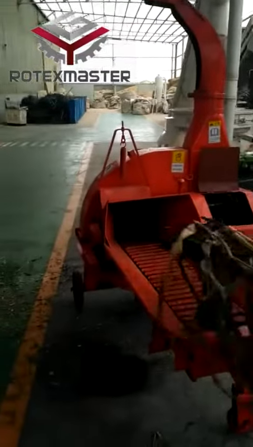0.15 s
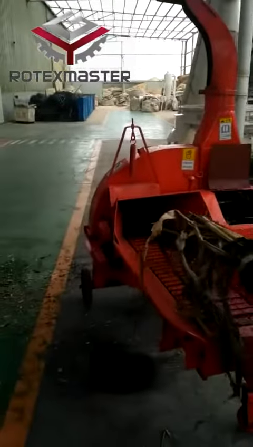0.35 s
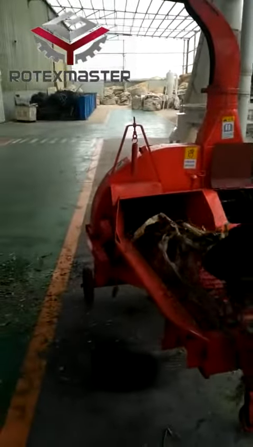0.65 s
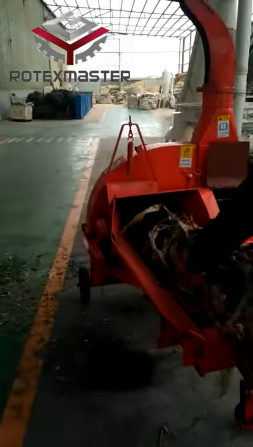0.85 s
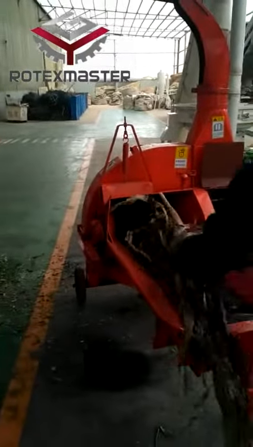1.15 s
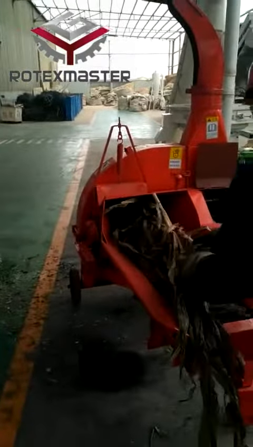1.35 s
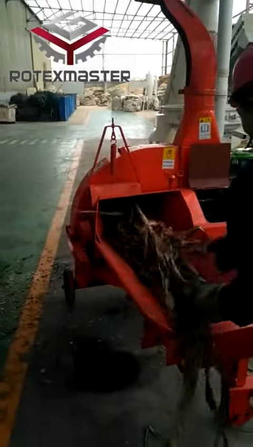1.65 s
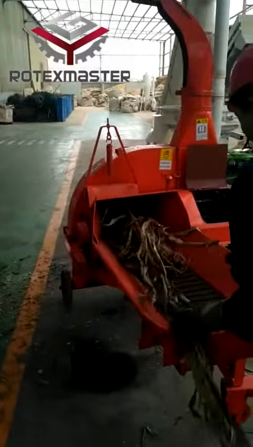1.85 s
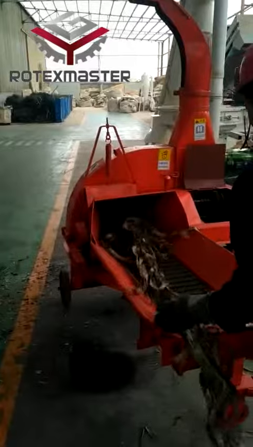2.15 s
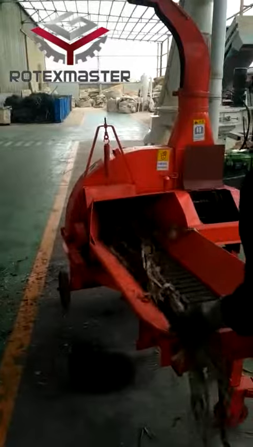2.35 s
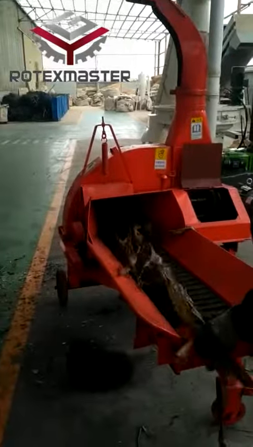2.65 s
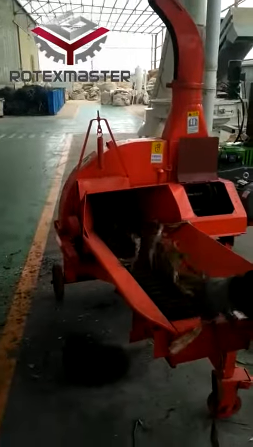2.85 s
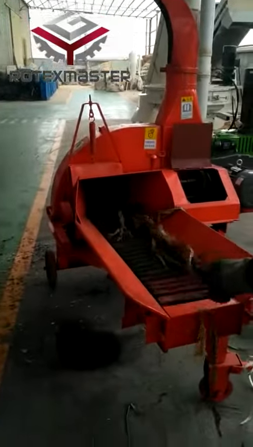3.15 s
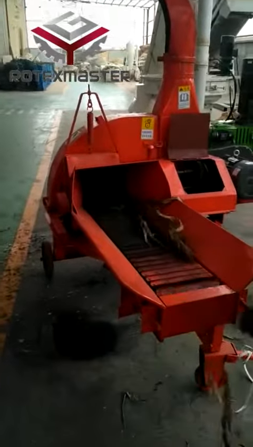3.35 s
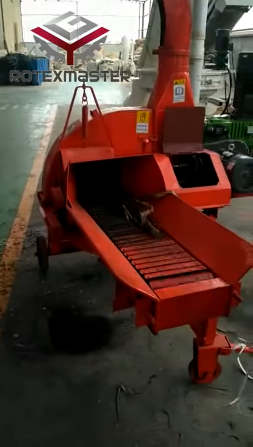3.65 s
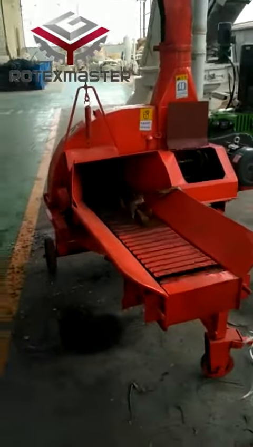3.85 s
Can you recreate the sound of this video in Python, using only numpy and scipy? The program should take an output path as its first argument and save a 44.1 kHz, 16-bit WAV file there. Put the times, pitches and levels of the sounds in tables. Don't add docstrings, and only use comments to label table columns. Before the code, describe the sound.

Dry stalks shredded in a farm machine inside a factory hall. Idle hum and regular clanks lead to harsh fluttering leaf fizz and lower stem thuds, which stop abruptly, heard on a phone with gain control.

```python
import sys
import numpy as np
from scipy import signal
from scipy.io import wavfile
from scipy.ndimage import uniform_filter1d

SR = 44100
rng = np.random.default_rng(int(sys.argv[2]) if len(sys.argv) > 2 else 0)


def ratio(d):
    e = np.asarray(d, float) / 20
    return 10 ** e


def int16_out(signal):
    q = np.round(np.clip(np.atleast_2d(signal).T, -1, 1) * 32767)
    wavfile.write(sys.argv[1], SR, q.astype(np.int16))


N = 176400
FIRST_PASS_S = 1.3835


def evened(x):
    return x / np.sqrt(np.mean(x ** 2) + 1e-20)


def read(points, hz):
    f, value = np.transpose(points)
    return np.interp(np.log(hz + 1), np.log(f + 1), value)


def follow(table, t, axis):
    return np.interp(t, np.array(table)[:, 0], np.array(table)[:, axis])


def slow(top_hz):
    t = np.arange(N // 64 + 2) * 64 / SR
    x = sum(np.sin(2 * np.pi * (f * t + rng.random())) for f in np.geomspace(top_hz / 5, top_hz, 24))
    return np.interp(np.arange(N) / 64, np.arange(len(t)), evened(x))


def noise(field_db, patchy_db, size=512, extra_db=lambda hz, s: 0):
    frames = N * 4 // size + 5
    hz = np.fft.rfftfreq(size, 1 / SR)
    real, imaginary, patches = rng.standard_normal((frames, len(hz), 3)).T
    patches = uniform_filter1d(patches, size // 128, 0)
    patches = evened(uniform_filter1d(patches, 6000 // size, 1))
    grid = hz[:, None], np.arange(frames)[None] * size / 4 / SR
    gain = ratio(field_db(*grid)) * np.ones(real.shape)
    gain = gain / np.sqrt((gain ** 2).mean(0))
    spectra = (real + 1j * imaginary) * gain * ratio(patchy_db * patches)

    def back(z):
        return signal.istft(z, nperseg=size, noverlap=size * 3 // 4)[1][:N]
    return back(spectra * ratio(extra_db(*grid))) / np.std(back(spectra))


def passes(rise_s, fall_s, bed, late_s, count=105):
    # (time [s], factor on the bed between the cuts)
    loose_leaves = [
        (1.4, 1.5),
        (1.53, 2.2),
        (1.85, 2.2),
        (2.05, .9),
        (2.5, .9),
        (2.75, 1.15),
    ]
    passes_per_s, jitter_s, spread_db = 40.0, .0008, 1.5
    chance = rng.standard_normal((count, 2))
    at = FIRST_PASS_S + late_s + np.arange(count) / passes_per_s + jitter_s * chance[:, 0]
    train = np.zeros(N)
    train[np.minimum(at * SR, N - 1).astype(int)] = ratio(spread_db * chance[:, 1])
    t = np.arange(-1500, 1501) / SR
    shape = np.exp(-(t / np.where(t < 0, rise_s, fall_s)) ** 2)
    chaff = bed * follow(loose_leaves, np.arange(N) / SR, axis=1)
    env = chaff + signal.oaconvolve(train, shape, "same")
    return env / np.sqrt(np.mean(env[N // 2:] ** 2))


def shredding():
    # (time [s], leaf fizz [dB], stem thud [dB], lowest stem pitch [octaves above 100 Hz])
    load = [(1.36, -45, -62, 3.3), (1.38, -25, -35, 6.5), (1.46, -32, -33.5, 12), (1.5, -30.5, -59, 5.7),
            (1.66, -31, -46, 4.3), (1.92, -30.5, -44, 4.02), (2.08, -26.5, -35, 4.34),
            (2.11, -27.5, -33.5, 2.8), (2.36, -28.5, -31.5, 1.6), (2.84, -30.5, -38.5, 0.68),
            (2.9, -29, -39, 4.8), (2.93, -29, -51, 3.8), (2.98, -35, -46, 2.7), (3.02, -50, -53.5, 3.3),
            (3.25, -48, -58, 1.2), (3.55, -47.5, -52, 3.4), (3.85, -51.5, -64, 5.2), (4, -52.5, -61, 2.2)]
    # (frequency [Hz], density [dB per Hz])
    leaf_spectrum = [(2350, -20.5), (4000, -18), (4450, -17.5), (6310, -10), (8000, -10.5), (11100, -7),
                     (13600, 0.5), (16000, -2.5), (16500, -53)]
    # (frequency [Hz], density [dB per Hz])
    stem_spectrum = [(290, -49), (500, -2.5), (872, 2.5), (1020, 0.5), (2290, -3.5), (2750, -1), (4000, 0),
                     (5970, -9.5), (9000, -21), (11700, -16), (19800, -120)]
    edge_db_per_oct, stem_top_hz = 59, 7700
    t = np.arange(N) / SR

    def stem_db(hz, s):
        below_edge = np.maximum(follow(load, s, axis=3) - np.log2(hz / 100 + 1e-3), 0)
        above_top = np.maximum(np.log2(hz / stem_top_hz + 1e-3), 0)
        return read(stem_spectrum, hz) - edge_db_per_oct * below_edge - 20 * above_top

    fizz = noise(lambda hz, s: read(leaf_spectrum, hz), 1.0)
    fizz = fizz * passes(rise_s=.006, fall_s=.009, bed=.68, late_s=0)
    fizz = fizz * ratio(follow(load, t, axis=1))
    thud = noise(stem_db, 1.6) * passes(rise_s=.0035, fall_s=.007, bed=.6, late_s=-.0014)
    thud = thud * ratio(follow(load, t, axis=2))
    return signal.sosfilt(signal.butter(4, 220, "high", fs=SR, output="sos"), fizz + thud)


def burst(t, rise_s, fall_s):
    return (1 - np.exp(-t / rise_s)) * np.exp(-t / fall_s)


def clanks():
    # (time [s], peak [dB], slat ring re peak [dB], length [ms])
    blows = [(.006, -21.5, -16.5, 9.2), (.078, -32, -16, 8), (.099, -34, -25, 5), (0.152, -15.5, -22.5, 18),
             (0.221, -23, -24, 8.4), (.234, -36, -21, 7), (.298, -15.5, -20, 11), (0.309, -26.5, -6, 8.2),
             (0.368, -26, -16, 9.5), (0.451, -13, -28, 7), (0.4618, -9.5, -44, 7.6), (0.517, -24, -25, 9.1),
             (0.5937, -25, -10, 10.3), (.665, -36.5, -13, 9.4), (.677, -28.5, -27, 6),
             (0.742, -23.5, -9, 13), (.809, -29, -17, 8), (.826, -36, -16, 5), (0.891, -24.5, -17, 9.2),
             (.960, -31, -17, 8.9), (1.039, -17.5, -11.5, 10), (1.109, -27.5, -8, 12),
             (1.185, -27, -7.5, 13), (1.194, -11, -32, 3.5), (1.197, -43, -17, 4.9), (1.256, -27, -4.5, 10),
             (1.333, -25.5, -11.5, 10), (1.362, -27, -23, 5.3), (1.373, -14, -23, 23),
             (1.399, -13, -40, 12), (1.455, -23, -40, 18), (1.476, -15.5, -47, 39), (1.582, -13, -30, 18),
             (1.601, -11.5, -18.5, 35), (1.884, -18, -30, 2.5), (3.154, -43.5, -20, 6),
             (3.57, -38.5, -11, 12), (3.851, -38, -25, 6), (3.921, -37.5, -31, 10), (3.994, -35, -28, 8)]
    # (frequency [Hz], density [dB per Hz])
    blow_spectrum = [(1180, -67), (2000, -30), (3430, -22), (4510, -23), (8000, -15), (13200, -1),
                     (15600, 1), (16500, -14.5)]
    # (frequency [Hz], width [Hz], level [dB])
    slat_modes = [(5440, 460, 4.5), (4440, 840, -1), (6850, 1800, -2), (3350, 460, -2)]
    blow_db, ring_trim_db = -10, -5
    rise_share, rise_s = .2, .0011
    t = np.arange(8000) / SR
    blow_tail = ratio(-10.5) * burst(t, rise_s, .013)
    ring_tail = ratio(-6.5) * burst(t, rise_s, .032)
    bright, ring = np.zeros((2, N + 8000))
    for s, db, ring_db, ms in blows:
        length_s = ms / 1000
        body = np.minimum(t / (rise_share * length_s), 1) * np.exp(-(t / length_s) ** 2.5)
        at = slice(round(s * SR), round(s * SR) + 8000)
        bright[at] += ratio(db + blow_db) * (body + blow_tail)
        ring[at] += ratio(db + ring_db + ring_trim_db) * (body + ring_tail)

    def modes_db(hz, s):
        return 10 * np.log10(sum(ratio(2 * db) / (1 + (2 * (hz - f) / w) ** 2) ** 2 for f, w, db in slat_modes))

    blow_noise = noise(lambda hz, s: read(blow_spectrum, hz), 0.77, size=256)
    return bright[:N] * blow_noise + ring[:N] * noise(modes_db, 2.0, size=256)


def machine():
    # (time [s], level [dB])
    roar_level = [(0, -42), (.18, -42), (.52, -43.5), (1.16, -41), (1.42, -44.5), (1.6, -51), (1.95, -54.5),
                  (2.35, -57), (2.85, -64.5), (3.09, -57.5), (3.4, -56), (4, -53)]
    # (frequency [Hz], density [dB per Hz])
    roar_spectrum = [(30, -13), (110, -4), (350, -2), (2600, -12), (2900, -17), (8100, -36), (13500, -48),
                     (16000, -21.5)]
    # (frequency [Hz], level [dB])
    rotor_orders = [(40.2, -70), (80.4, -52.5), (120.6, -57), (160.8, -45.5), (201, -53), (241.2, -54),
                    (366, -56.5), (402, -68), (967, -56.5), (1362, -60)]
    # (frequency [Hz], factor on the sag in dB [1])
    sag_share = [(30, 1.84), (100, 1.24), (160, 1.21), (300, 1.45), (700, 1.28), (1500, 0.88), (3000, 0.83),
                 (12000, 0.064)]
    hum_sag, waver_db, waver_rad = .94, .7, .12
    t, top_db = np.arange(N) / SR, roar_level[0][1]

    def sag_db(hz, s):
        return read(sag_share, hz) * (follow(roar_level, s, axis=1) - top_db)

    roar = noise(lambda hz, s: read(roar_spectrum, hz), 2.1, size=2048, extra_db=sag_db)
    hum = np.zeros(N)
    for hz, db in rotor_orders:
        level = ratio(db + hum_sag * sag_db(hz, t) + waver_db * slow(15.0))
        phase = 2 * np.pi * (hz * t + rng.random()) + waver_rad * slow(8.0) * np.sqrt(hz / 160)
        hum += level * np.sqrt(2) * np.sin(phase)
    return ratio(top_db + 3.0) * roar + hum


def open_bands():
    # (start [s], length [s], low edge [Hz], high edge
    # [Hz])
    gate_bands = [(.155, .05, 15200, 15800), (.29, .05, 15200, 15800), (.309, .085, 5200, 5900),
                  (.312, .03, 10300, 11800), (.468, .08, 10000, 15500), (.595, .02, 15200, 15800),
                  (.75, .07, 4800, 6200), (1.044, .05, 5100, 5800), (1.046, .04, 8000, 9300),
                  (1.2, .05, 5000, 5700), (1.205, .045, 12000, 15800), (1.256, .06, 4900, 7400),
                  (1.37, .045, 420, 840), (1.376, .04, 6000, 8500), (1.48, .1, 2800, 3800),
                  (1.57, .1, 2500, 4200), (1.601, .02, 2100, 7000), (1.64, .18, 1170, 1360),
                  (1.7, .08, 1800, 4000), (2.02, .08, 1100, 1500), (2.11, .42, 230, 330),
                  (2.185, .027, 40, 150), (2.287, .24, 1500, 2500), (2.3, .59, 590, 2630),
                  (2.655, .03, 35, 110), (2.77, .05, 310, 450), (2.93, .12, 5230, 7700),
                  (2.944, .25, 1900, 2500), (2.95, .26, 3100, 3800), (2.95, .3, 1350, 1700),
                  (2.96, .3, 680, 860), (3.15, .012, 1200, 3000), (3.43, .3, 1950, 2250),
                  (3.5, .22, 240, 340), (3.51, .07, 1100, 1600), (3.6, .12, 360, 1200),
                  (3.91, .12, 300, 1500)]
    gate_levels = [-43, -42, -47.5, -44, -44, -46, -52, -50, -52, -49, -44.5, -44.5, -43.5, -40.5, -48.5,
                   -49, -42, -53, -47, -49.5, -59.5, -61, -40.5, -41, -62.5, -51, -48, -60.5, -59, -55.5,
                   -59.5, -51.5, -59, -64, -56, -56, -53.5]
    open_s, close_s, edge_oct = .004, .012, .014

    def soft(u):
        return 1 / (1 + np.exp(-np.clip(u, -40, 40)))

    def field_db(hz, s):
        power = 0
        for (at, length, low, high), db in zip(gate_bands, gate_levels):
            opening = soft((s - at) / open_s * 3)
            closing = soft((at + length - s) / np.minimum(close_s, length / 6))
            above_low = soft(np.log2(hz / low + 1e-9) / edge_oct)
            below_high = soft(np.log2(high / (hz + 1)) / edge_oct)
            density = ratio(2 * db) * SR / 2 / (high - low)
            power = power + density * opening * closing * above_low * below_high
        return 10 * np.log10(power + 1e-20)

    throb = passes(rise_s=.013, fall_s=.015, bed=1.0, late_s=0)
    gated = noise(lambda hz, s: 0 * hz, 1.8, size=1024, extra_db=field_db)
    return gated * np.where(np.arange(N) > FIRST_PASS_S * SR, throb, 1)


def scene():
    return (shredding() + clanks() + machine() + open_bands())[None]


def low_pass(x):
    return signal.sosfilt(signal.butter(12, 16990, fs=SR, output="sos"), x)


def record(dry):
    edge_hz, leak_db = 15850, -44
    lowpass = signal.firwin(601, edge_hz, window=("kaiser", 6), fs=SR)
    limited = signal.oaconvolve(dry, lowpass[None], "same")
    return low_pass(limited + ratio(leak_db) * (dry - limited))


dry = scene()
out = record(dry)
int16_out(out)
```